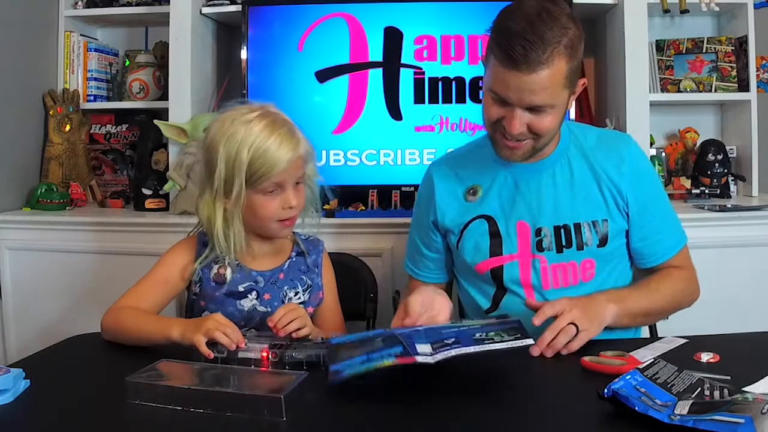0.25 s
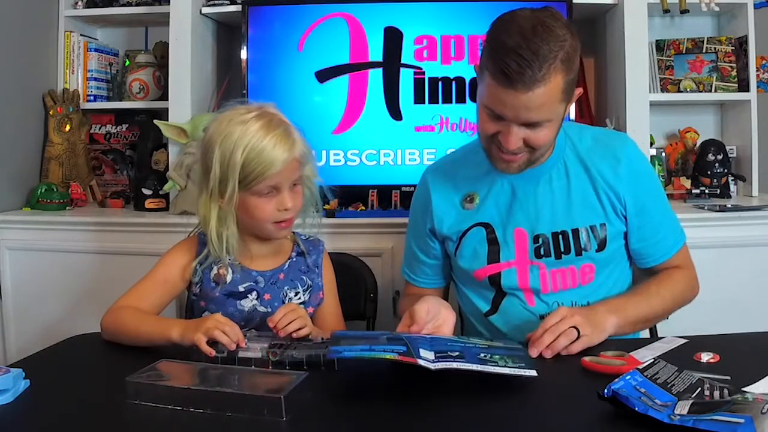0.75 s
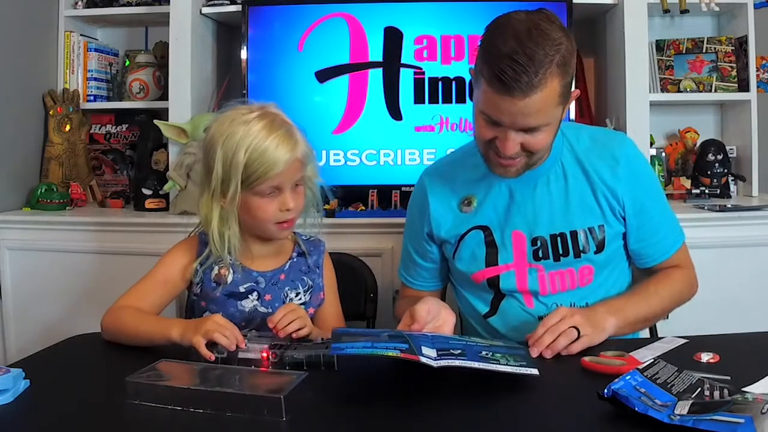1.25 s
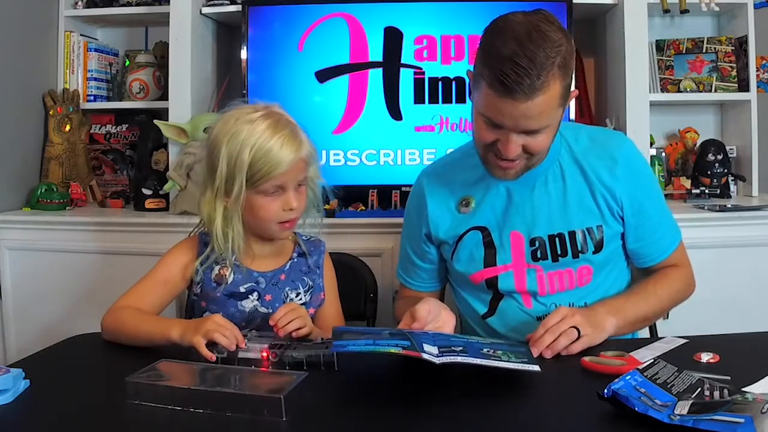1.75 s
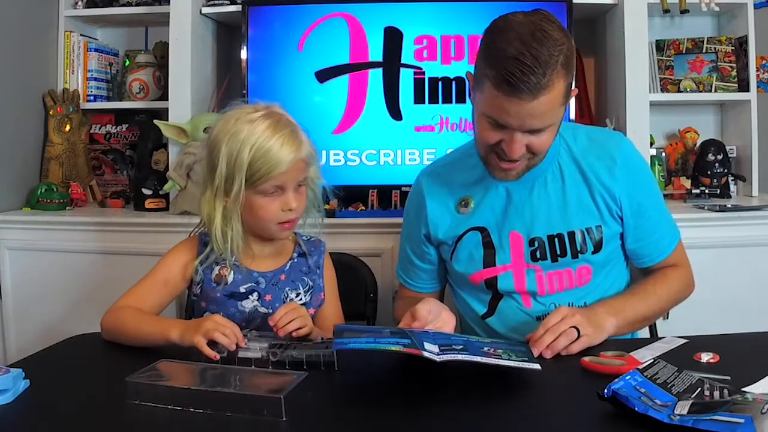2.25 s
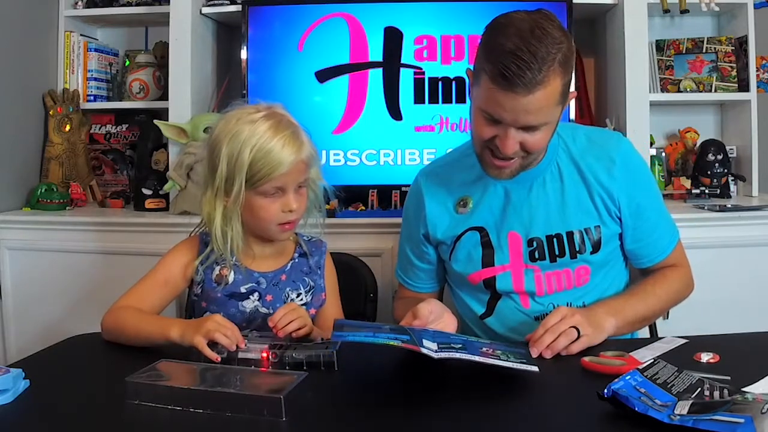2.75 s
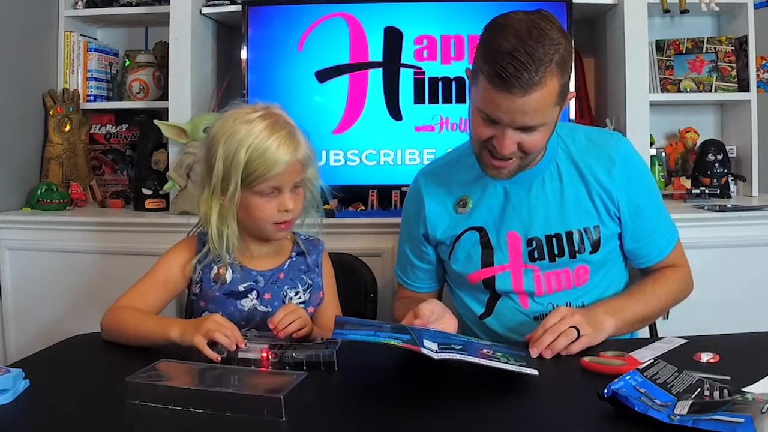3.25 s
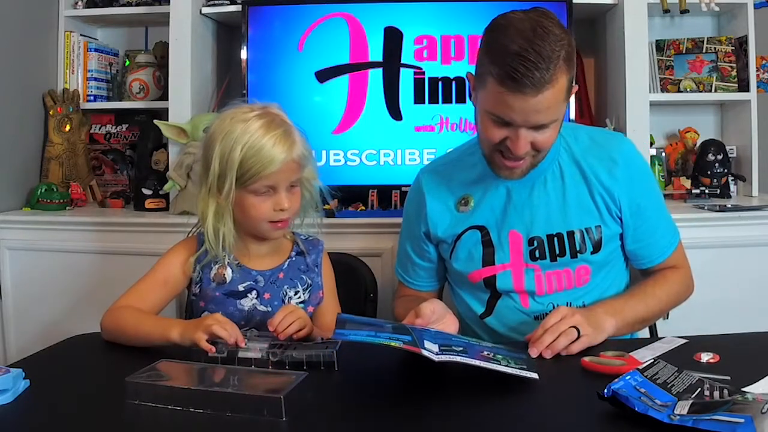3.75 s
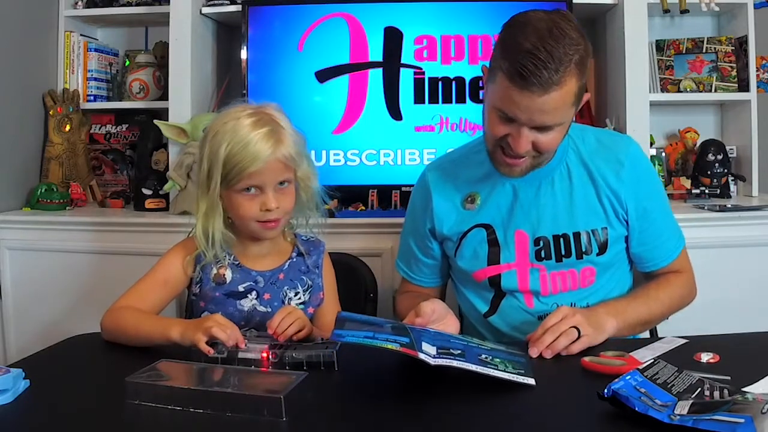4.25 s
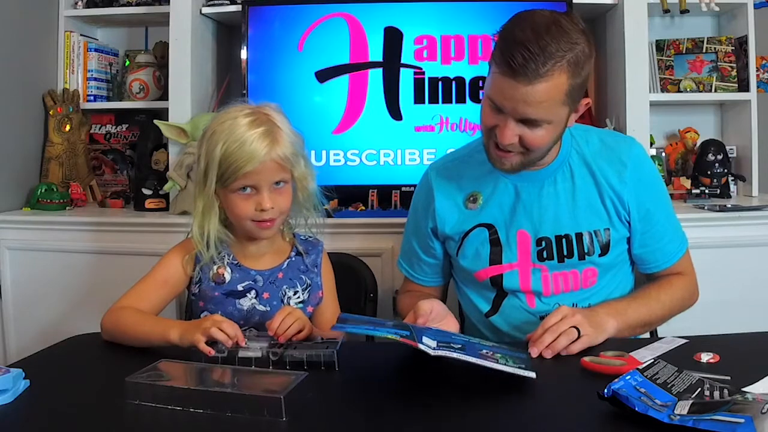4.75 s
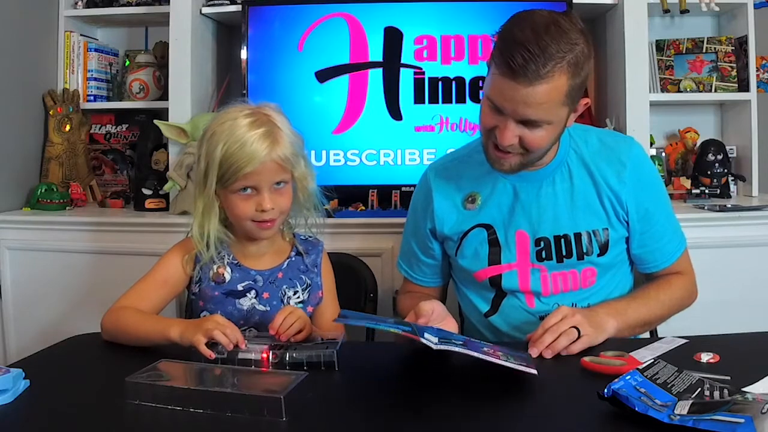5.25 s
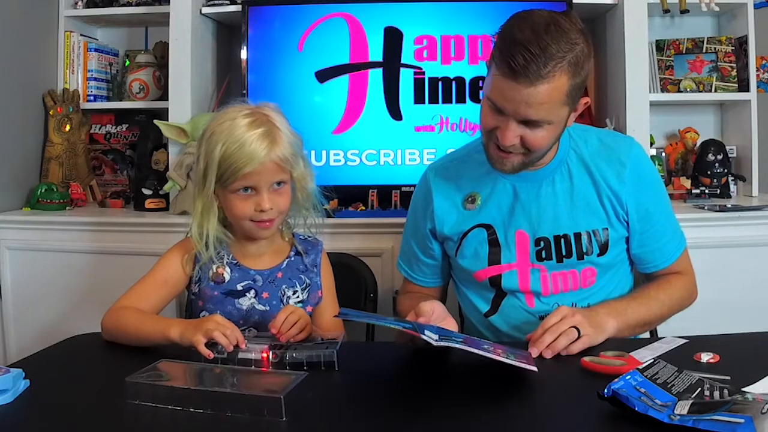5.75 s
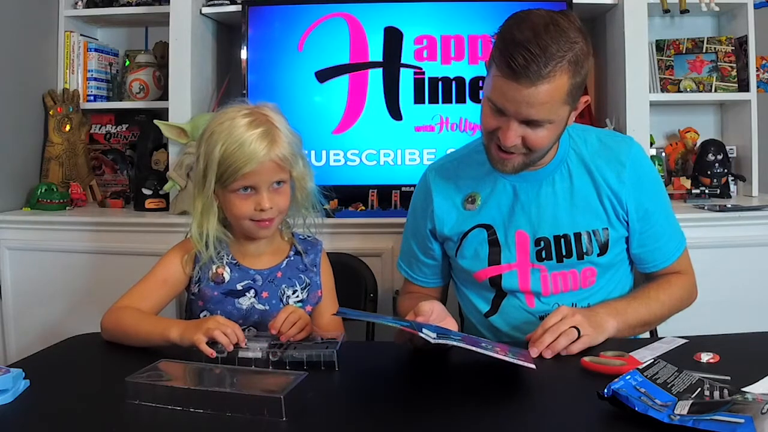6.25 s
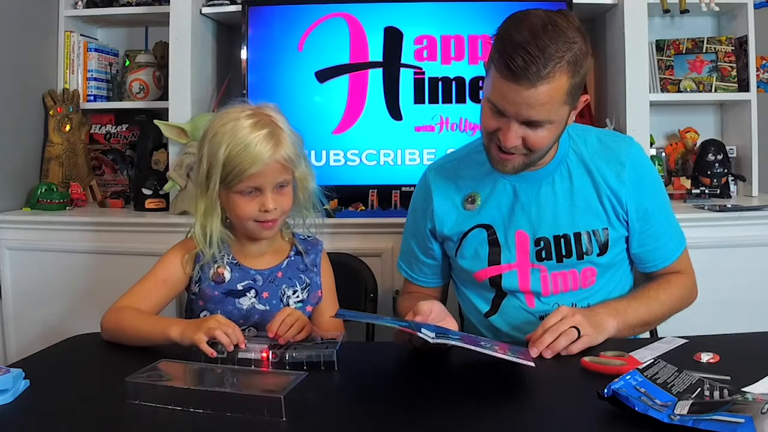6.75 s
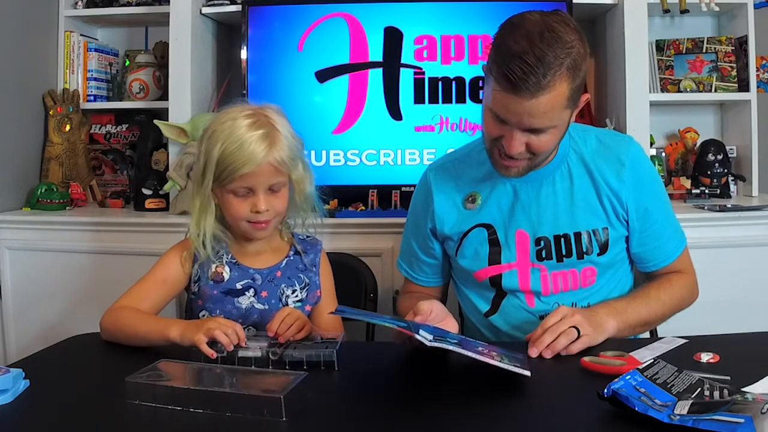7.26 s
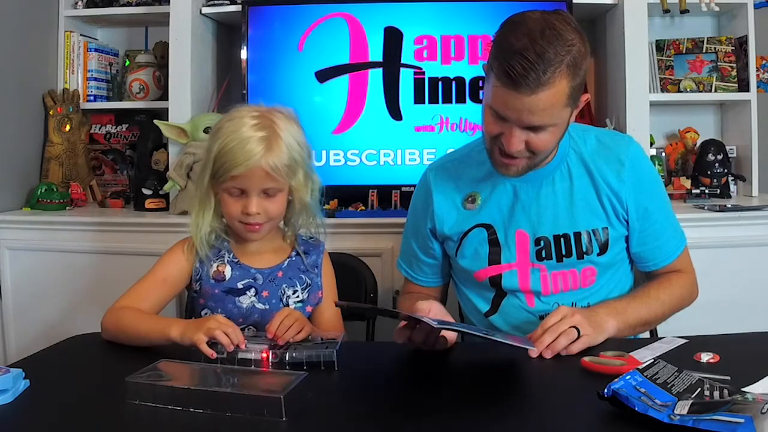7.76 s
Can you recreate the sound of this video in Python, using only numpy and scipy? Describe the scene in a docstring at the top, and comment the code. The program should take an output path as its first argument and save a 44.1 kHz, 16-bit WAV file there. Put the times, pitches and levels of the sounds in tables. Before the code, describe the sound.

Six pairs of light, crisp clicks come from a plastic push button in a softly humming room.

```python
"""A small plastic push switch lies on a table two metres from a camera, in a humming, furnished room.
First a fingertip scrapes over the key, which ticks in its guide; then the spring dome snaps,
knocking the hollow case with a bright crack, and the room answers briefly. About half a second
later the release snaps more brightly still. The pair is heard six times, while throughout
a draught buffets the two microphone ports and a faint, regular patter sounds in the treble."""
import sys
import numpy as np
from scipy import signal
from scipy.fft import rfft, irfft
from scipy.io import wavfile
from scipy.ndimage import uniform_filter1d

SR = 44100
rng = np.random.default_rng(int(sys.argv[2]) if len(sys.argv) > 2 else 0)


def put_to_file(sound):
    """Save the sound as 16-bit audio at rate SR, in the file named by the first command-line argument."""
    columns = np.atleast_2d(sound).T  # one column per channel
    safe = np.clip(columns, -1, 1)
    whole_steps = np.round(safe * 32767)
    wavfile.write(sys.argv[1], SR, whole_steps.astype(np.int16))


N = 352800

# snaps, press then release: t/s, bright crack peak/dB, middle knock/dB, low knock/dB, high knock/dB
SNAPS = [(0.5312, -37, -33.5, -47, -47.5), (0.9427, -21.5, -33, -48.5, -48.5),
         (2.0319, -32, -33.5, -48, -45), (2.512, -28, -36, -50, -47.5), (3.464, -31.5, -34.5, -49, -46.5),
         (3.9241, -19.5, -35, -49.5, -45.5), (4.7572, -32.5, -30.5, -46.5, -43),
         (5.2026, -19, -34.5, -41, -45), (5.9951, -32.5, -34, -45.5, -46), (6.4355, -20, -36, -47, -49),
         (7.2023, -34.5, -36.5, -47.5, -44), (7.6324, -20.5, -35, -50.5, -47.5)]


def snaps():
    """Snap-through buckling: the spring dome flips with a full knock, cracking harder when brighter."""
    rows = [(s, bright, -41 + 0.33 * bright, *knocks) for s, bright, *knocks in SNAPS]
    return contacts(rows, push_s=0.0028, crack_s=0.0013)


def ticks():
    """Light impacts: the sliding key catches in its guide."""
    # t/s, bright crack peak/dB, crack/dB, middle knock/dB
    catches = [(0.1305, -54, -70, -67), (0.3625, -47.5, -62, -63.5), (0.4183, -62, -66.5, -67),
               (0.4626, -44.5, -72, -65), (0.4845, -46, -67, -60), (0.8281, -45, -70, -61),
               (0.873, -45, -57, -70), (1.5625, -63, -73, -69), (1.9506, -64, -63, -63),
               (2.0004, -45, -80, -80), (2.3275, -46, -66, -58.5), (2.351, -51, -69, -75),
               (2.38, -51, -80, -69), (2.408, -50, -55, -64), (2.4385, -45, -75, -64),
               (2.4578, -38, -82, -78), (3.3795, -51, -66, -70), (3.4119, -45, -70, -61),
               (3.454, -60, -68, -68), (3.7557, -53, -70, -75), (3.7878, -60, -67, -66),
               (3.809, -51, -70, -75), (3.82, -45, -78, -60), (3.8596, -47, -56, -61),
               (3.9105, -39, -62, -60), (4.6666, -51, -65.5, -63), (4.6849, -44.5, -70, -64),
               (5.1215, -51, -66, -62), (5.1581, -43.5, -56, -66), (5.8943, -52, -69, -67),
               (5.9215, -47.5, -65.5, -61), (6.3601, -46, -62, -57), (6.3694, -46, -54.5, -52.5),
               (6.3944, -45, -72, -59), (6.4118, -49, -59, -45.5), (6.5266, -41, -87, -61),
               (7.1464, -51, -69.5, -65), (7.1836, -45, -81, -80), (7.552, -53, -66, -62),
               (7.5766, -46, -54.5, -68), (7.5948, -54, -75, -52.5), (7.6153, -41, -62, -77),
               (7.7262, -53, -69, -46.5), (7.7415, -59, -61, -62)]
    rows = [(s, bright, crack, knock, knock - 1.5, crack + 1.5) for s, bright, crack, knock in catches]
    return contacts(rows, push_s=0.0017, crack_s=0.0016)


def contacts(rows, push_s, crack_s):
    """Superposition of impacts and their echoes; hand and switch shift, so each echo differs."""
    out = np.zeros((2, N + SR))
    for s, *levels in rows:
        sound = impact(*levels, push_s, crack_s)
        echo = room(sound)
        i = int((s - .0003) * SR)
        out[0, i:i + len(sound)] += sound
        out[1, i + 1:i + 1 + len(sound)] += sound  # reaches the right port one sample later
        out[:, i:i + echo.shape[1]] += echo
    return out[:, :N]


def impact(bright_db, crack_db, knock_db, low_db, high_db, push_s, crack_s, size=4000):
    """Modal ringing: a soft push excites the case; a sharp hit, bounce and rattle crack above it."""
    # damped modes of the case and table top: f/Hz, relative level/dB, T60/s
    case_modes = [(358.5, -14.5, 0.36), (462, -10.5, 0.092), (648, -2, 0.016), (982, -9, 0.043),
                  (1062, -5.5, 0.016), (1145, -11, 0.015), (1337, -3, 0.04), (1552, -3, 0.011),
                  (1794, -5.5, 0.0048)]
    hz, db, t60 = np.transpose(case_modes)[:, :, None]
    t, attack = np.arange(size) / SR, int(.02 * SR)  # rms levels hold over the attack
    chance = rng.standard_normal((3, size))
    # every blow lands a little differently, so mode strength and pitch scatter
    strength_db = np.where(hz < 800, low_db, np.where(hz < 1250, knock_db, high_db))
    db = db + 2.0 * chance[0, :len(case_modes), None] + strength_db
    hz = hz * (1 + 0.028 * chance[0, -len(case_modes):, None])
    modes = np.sin(2 * np.pi * hz * t) * 1000. ** (-t / t60) * (1 - np.exp(-t / push_s))
    modes = modes / modes[:, :attack].std(axis=1, keepdims=True)
    knock = np.sum(undb(db) * modes, axis=0)
    force = np.array([[.2], [.1]]) * chance[1:] * t / crack_s * np.exp(-t / crack_s)  # rattle
    hit = 16
    bounce = hit + int(.0013 * SR * (1 + .1 * chance[0, 99]))
    force[:, hit] += 1
    force[:, bounce] -= .2
    fizz = undb(-10) * band(force[0], 12300, 13060)
    crack = band(force[0], 1930, 6800) + fizz
    crack = crack / crack[:attack].std()
    bright = band(force[1], 8100, 10800)
    return knock + undb(crack_db) * crack + undb(bright_db) * bright / np.abs(bright).max()


def scrape():
    """Sliding friction: skin slips over the plastic in dense, uneven grains, swelling until each snap."""
    # start t/s, level of the bright part at mid-stroke/dB
    strokes = [(0.1, -76), (0.77, -76), (1.93, -72), (2.27, -75), (3.36, -78), (3.74, -70), (4.65, -77),
               (5.1, -67), (5.7, -77), (6.32, -72), (7.12, -77), (7.52, -70.5)]
    swell_db, dull_db = 7, -9
    t, gain = np.arange(N) / SR, np.zeros(N)
    for (start, db), (end, *_) in zip(strokes, SNAPS):
        ramp = np.clip((t - start) / (end - start) - .5, -.5, .5)
        gain += (t > start) * (t < end) * undb(db + swell_db * ramp)
    grains = rng.standard_normal((2, N)) * undb(2.5 * rng.exponential(size=N))
    grains *= rng.random(N) < .06
    dull, bright = band(grains[0], 1760, 4700), band(grains[1], 9540, 11000)
    friction = dull / dull.std() * undb(dull_db) + bright / bright.std()
    sound = uniform_filter1d(gain, size=400) * friction
    return np.array([sound, np.roll(sound, 1)]) + room(sound)[:, :N]


def room(dry):
    """Reverberation: dense reflections decay exponentially, their bass alike at both ports."""
    # echo spectrum: f/Hz, level/dB
    spectrum = [(100, 17.5), (1000, 0), (4000, 2.5), (9000, -9.5), (14000, -12)]
    # stereo width: f/Hz, side minus mid level/dB
    width = [(100, -34), (1000, -12.5), (3000, -8), (9000, 2.5)]
    t60_s, echo_db = 0.35, -0.5
    t = np.arange(1 << 14) / SR
    onset = np.clip((t - .002) / 0.0021, 0, 1)
    early = 1 + undb(-8) * np.exp(-t / 0.058)  # near echoes from table and shelves stand out
    fade = 1000. ** (-t / t60_s) * onset * early
    mid, side = (colour(rng.standard_normal(len(t)), spectrum) for _ in range(2))
    response = pair(mid, colour(side, width)) * fade
    return undb(echo_db) / np.sqrt(np.sum(fade ** 2)) * signal.fftconvolve(dry[None], response, axes=1)


def draught():
    """Turbulent pressure: slow eddies push on each port separately, gusting together."""
    # gust contour: t/s, level/dB
    gusts = [(0.05, -46.5), (0.47, -53.5), (1.37, -55.5), (1.46, -49), (1.48, -55), (1.52, -37),
             (1.59, -42.5), (1.96, -54), (2.07, -43), (2.14, -52.5), (4.14, -58), (4.38, -55), (4.87, -56),
             (5.11, -49), (5.15, -55), (5.37, -45.5), (5.53, -46), (5.66, -39.5), (5.7, -49), (5.92, -38),
             (5.95, -49), (6.1, -32.5), (6.23, -49.5), (6.32, -38.5), (6.63, -48), (6.91, -43),
             (7.33, -57.5), (7.95, -53.5)]
    # eddy spectrum: f/Hz, relative level/dB
    spectrum = [(8, 0.5), (25, 5), (50, 0.5), (90, -14.5), (200, -47), (500, -143)]
    eddy_db, left_right_db = 3, np.array([[1.8], [4.2]])
    s, db = np.transpose(gusts)
    eddies = np.array([colour(rng.standard_normal(N), spectrum) for _ in range(2)])
    gust_db = np.interp(np.arange(N) / SR, s, db) + eddy_db * wander(rate_hz=20)
    return eddies / eddies.std() * undb(gust_db + left_right_db)


def hum():
    """Broadband noise: steady hum and hiss, with a slight random flutter applied to the treble level."""
    # hum and hiss: f/Hz, spectral density level/dB
    spectrum = [(30, -70), (70, -80), (150, -81), (260, -81), (400, -84.5), (700, -92), (950, -92),
                (1600, -102), (2200, -108), (3800, -114), (6000, -114), (8600, -115), (10000, -113),
                (11200, -109), (11700, -125), (13000, -140)]
    # stereo width: f/Hz, side minus mid level/dB
    width = [(50, -18), (150, -21), (1000, -11), (2400, -2.5), (6000, -2), (12000, -2)]
    flutter_db = 0.87
    mid, side = (colour(rng.standard_normal(N), spectrum) * np.sqrt(SR / 2) for _ in range(2))
    tone = pair(mid, colour(side, width)) * undb([[.4], [-.4]])  # a little louder on the left
    treble = signal.sosfilt(signal.butter(2, 1500, "high", fs=SR, output="sos"), tone)
    return tone + treble * (undb(flutter_db * wander(rate_hz=55)) - 1)


def patter():
    """Periodic pulse trains: a faint, regular treble patter, alike on both channels."""
    # burst trains: repetition f/Hz, first t/s, lower edge f/Hz, upper edge f/Hz
    trains = [(29.97, .0225, 5300, 6900), (23.44, .018, 7900, 9600), (23.44, .029, 7900, 9600)]
    # crest of the bursts, train by train: rms level/dB
    levels = [-73.5, -77.5, -77]
    grid_hz, first_s, wait_s = 62.256, .011, .0062
    count = np.arange(N * 30 // SR)
    (repeat_hz, _, *lower_band), (_, _, *upper_band) = trains[:2]
    # once per period of the first train, an extra burst falls on the next grid point after the wait
    extra_s = np.ceil((count / repeat_hz + wait_s - first_s) * grid_hz) / grid_hz + first_s
    out = bursts(extra_s, *upper_band, db=-71.5) + bursts(extra_s, *lower_band, db=-79.5)
    for (hz, first, lo_hz, hi_hz), db in zip(trains, levels):
        out += bursts(first + count / hz, lo_hz, hi_hz, db)
    return out


def bursts(times, lo_hz, hi_hz, db, width_s=0.00093, scatter_db=3):
    """Amplitude modulation: Gaussian envelopes let through puffs of band noise at the given times."""
    spikes, span = np.zeros(N), np.arange(-200, 201) / SR
    times = times[times < N / SR]
    spikes[(times * SR).astype(int)] = undb(db + scatter_db * rng.standard_normal(len(times)))
    envelope = np.convolve(spikes, np.exp(-.5 * (span / width_s) ** 2), "same")
    noise = band(rng.standard_normal(N), lo_hz, hi_hz)
    return envelope * noise / noise.std()


def wander(rate_hz):
    """Linear interpolation between random values, rate_hz of them a second."""
    hold = int(SR / rate_hz)
    return uniform_filter1d(np.repeat(rng.standard_normal(N // hold + 1), hold), hold)[:N]


def colour(x, points):
    """Spectral shaping by (f/Hz, level/dB) points joined on a log-frequency axis."""
    hz, db = np.transpose(points)
    f = np.fft.rfftfreq(len(x), 1 / SR) + 1
    return irfft(rfft(x) * undb(np.interp(np.log(f), np.log(hz), db)), len(x))


def band(x, lo_hz, hi_hz):
    """Causal band-pass filtering."""
    return signal.sosfilt(signal.butter(4, [lo_hz, hi_hz], "band", fs=SR, output="sos"), x)


def pair(mid, side):
    """Mid-side stereo: the sum is left, the difference right."""
    return np.array([mid + side, mid - side])


def undb(db):
    """Amplitude ratio of a level in decibels."""
    return 10 ** (np.asarray(db) / 20)


def scene():
    """Linear superposition of switch, finger, hum, draught and patter."""
    return snaps() + ticks() + scrape() + hum() + draught() + patter()


def record(dry):
    """Air resonates in the ports and the housing cancels bands; a top cut and converter offset follow."""
    # destructive interference at the housing: centre f/Hz, bandwidth/Hz
    notches = [(2400, 1300), (4800, 1300), (7200, 1200), (12000, 1500)]
    # converter offset, left and right: amplitude/full scale
    offset = [
        [-.0497],
        [-.0379],
    ]
    port_hz, port_width_hz, port_db, top_hz = 8700, 1400, 12, 13900
    resonance = signal.lfilter(*signal.iirpeak(port_hz, port_hz / port_width_hz, SR), dry)
    x = dry + undb(port_db) * resonance
    for hz, width in notches:
        x = signal.lfilter(*signal.iirnotch(hz, hz / width, SR), x)
    return signal.sosfilt(signal.ellip(8, .2, 70, top_hz, fs=SR, output="sos"), x) + offset


dry = scene()
out = record(dry)
put_to_file(out)
```